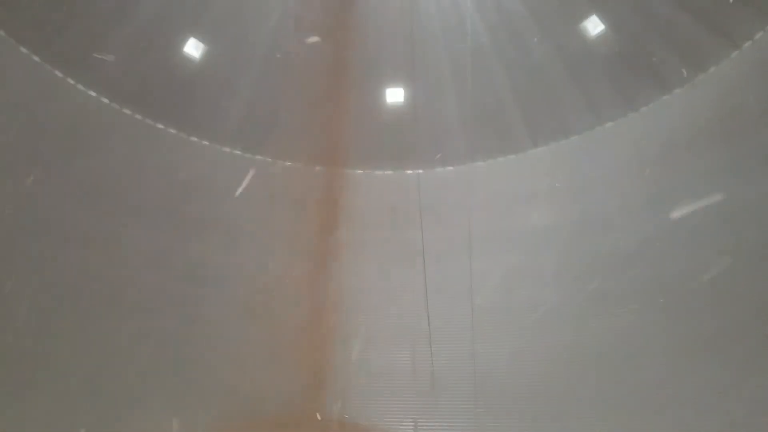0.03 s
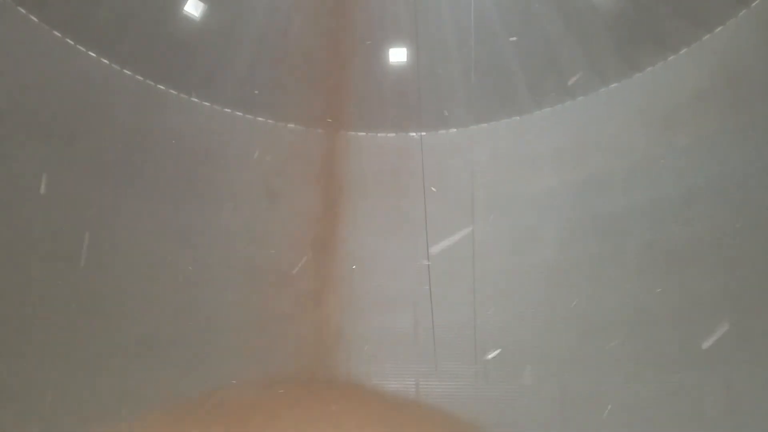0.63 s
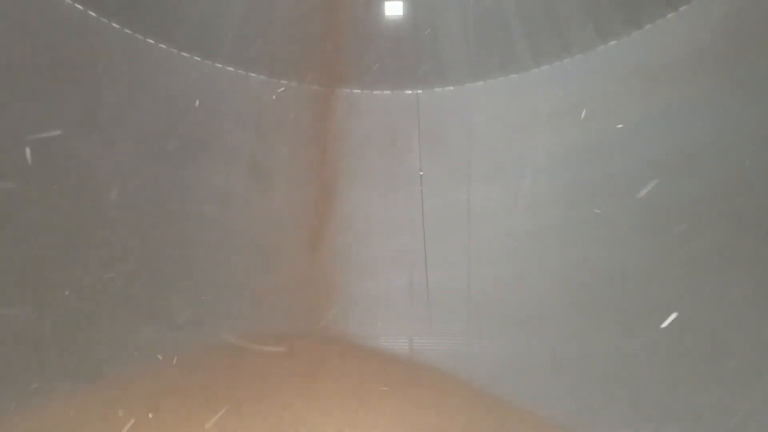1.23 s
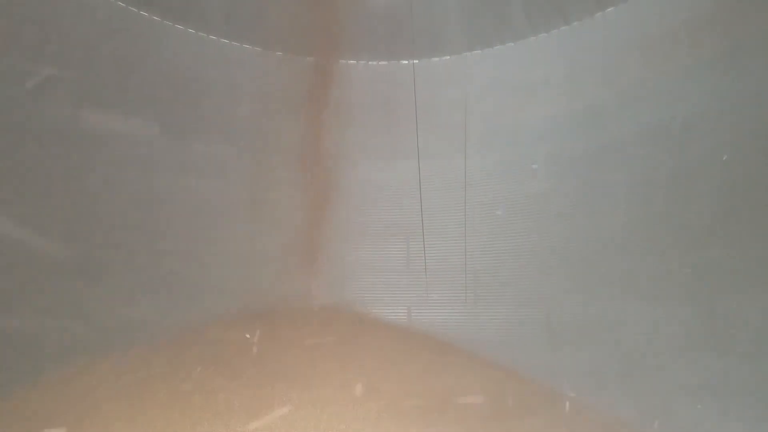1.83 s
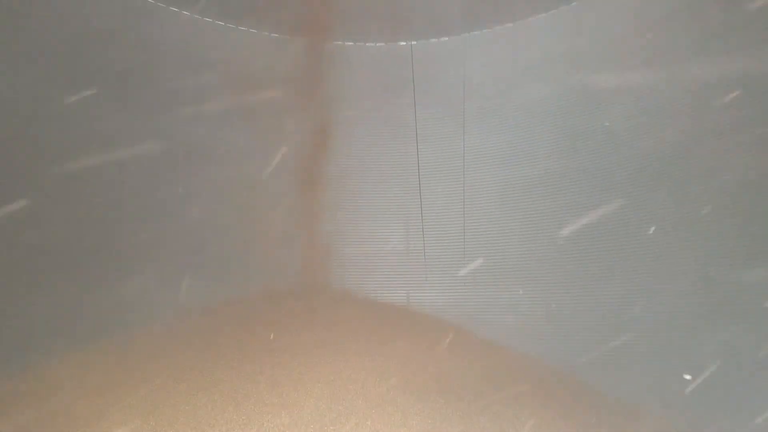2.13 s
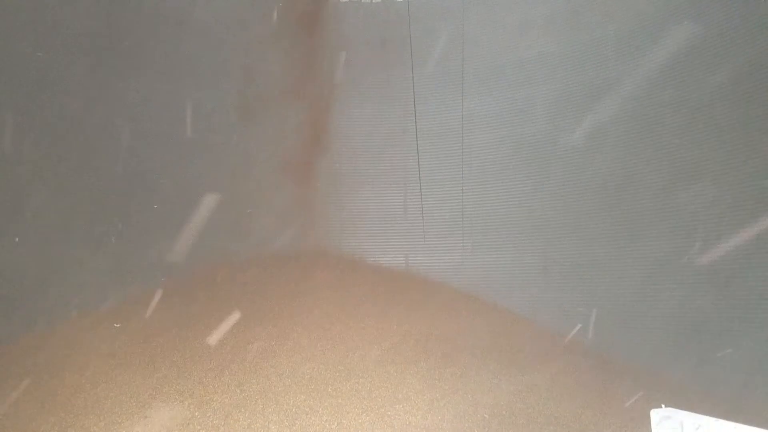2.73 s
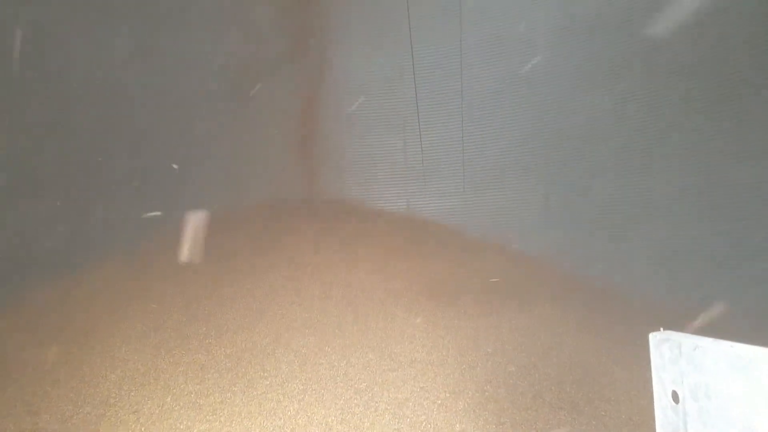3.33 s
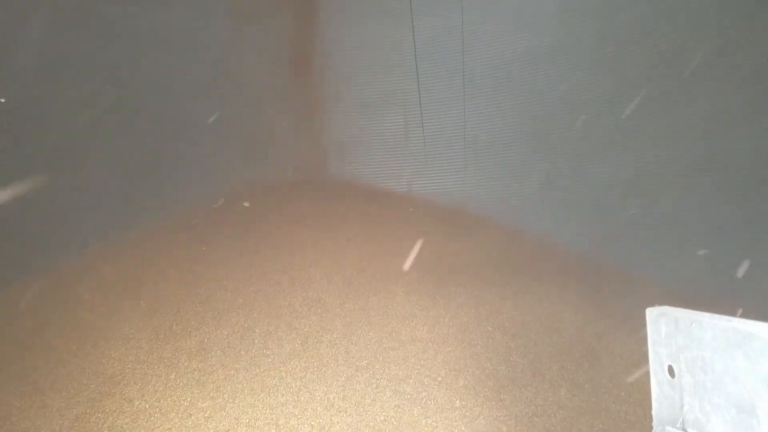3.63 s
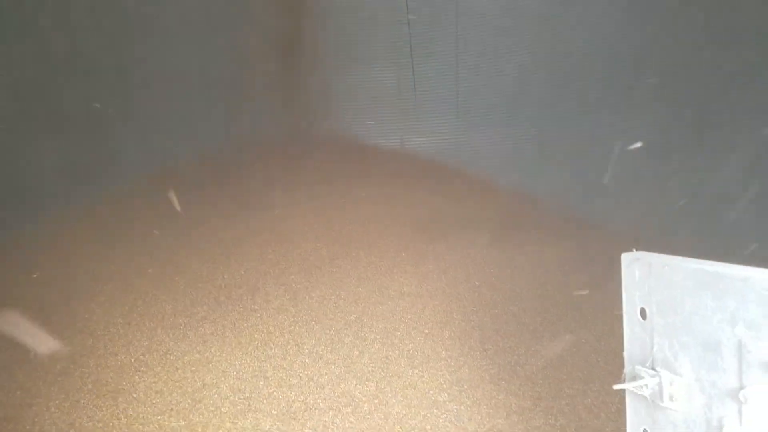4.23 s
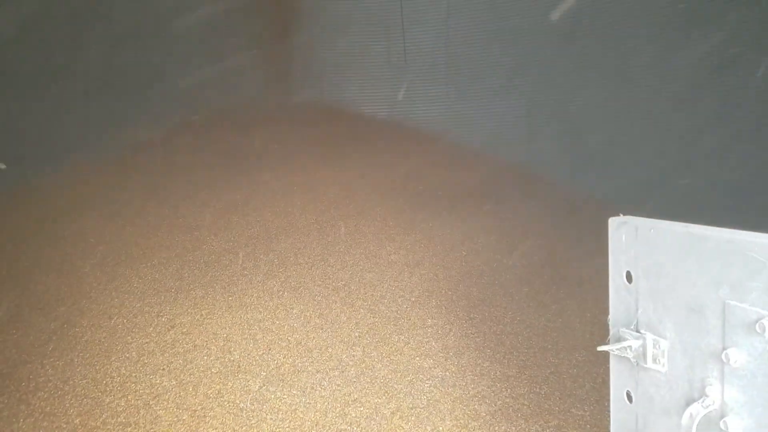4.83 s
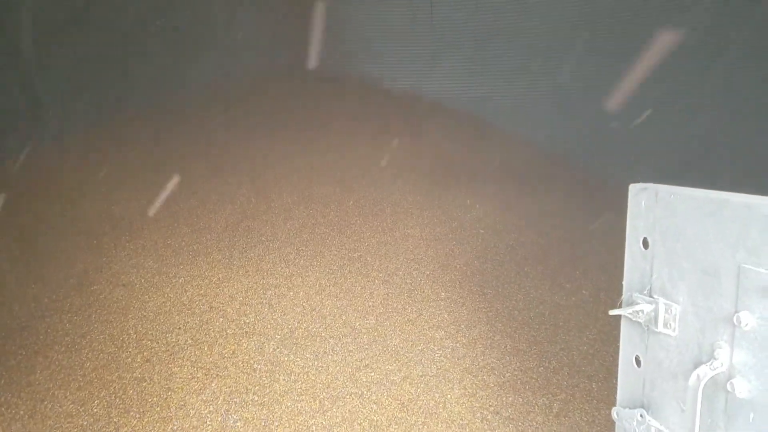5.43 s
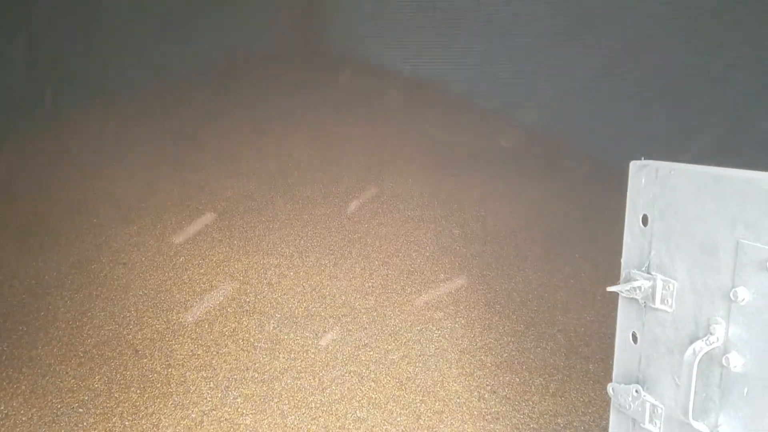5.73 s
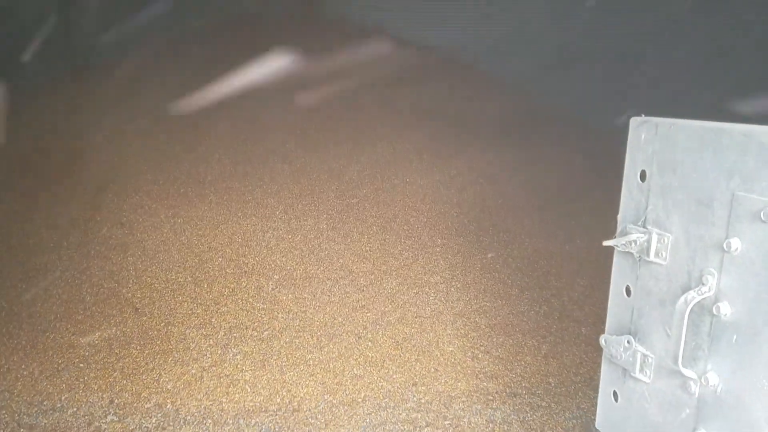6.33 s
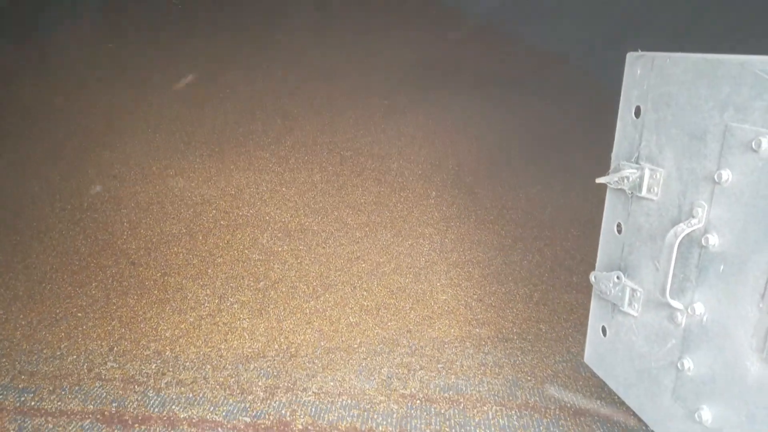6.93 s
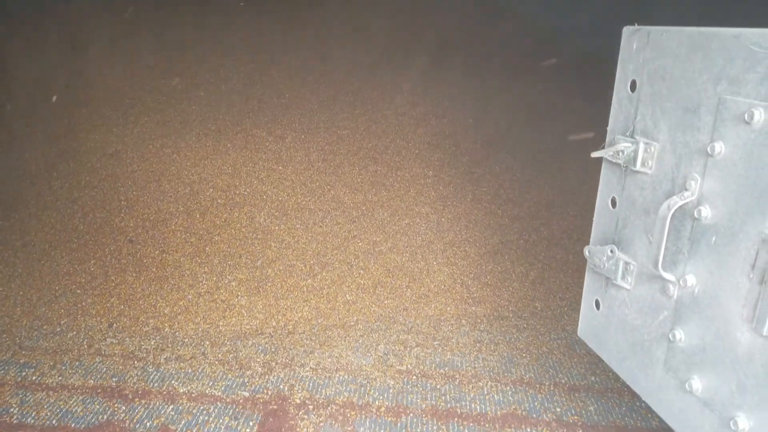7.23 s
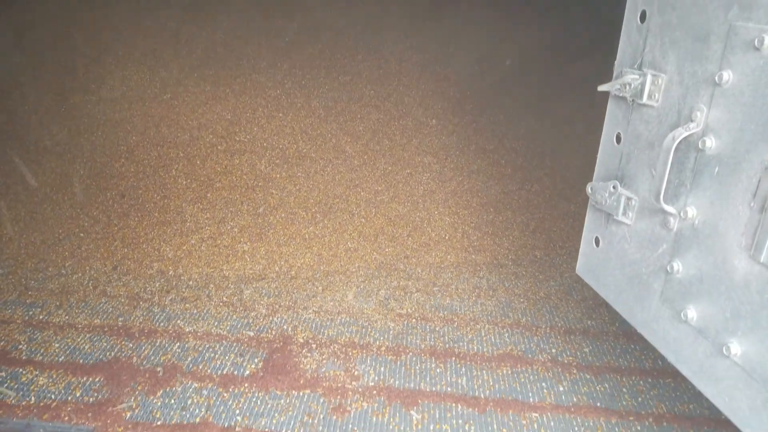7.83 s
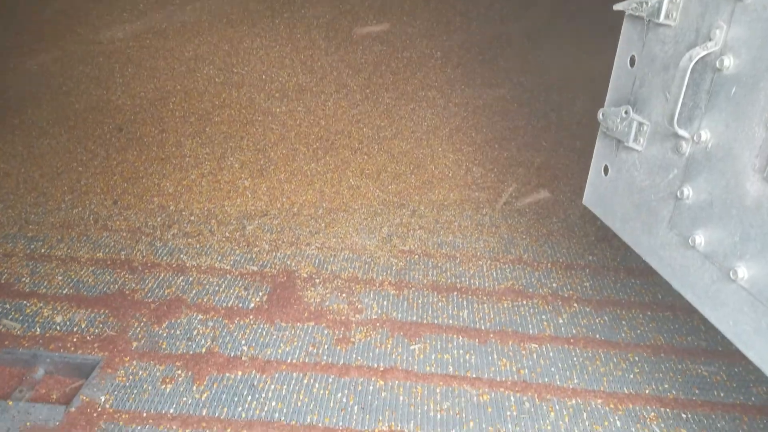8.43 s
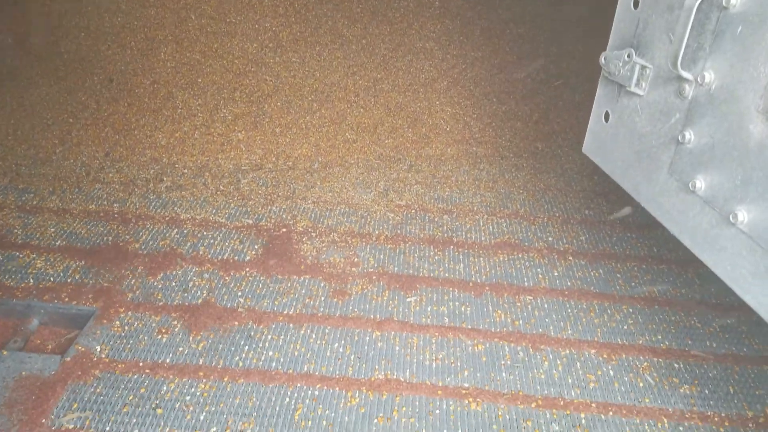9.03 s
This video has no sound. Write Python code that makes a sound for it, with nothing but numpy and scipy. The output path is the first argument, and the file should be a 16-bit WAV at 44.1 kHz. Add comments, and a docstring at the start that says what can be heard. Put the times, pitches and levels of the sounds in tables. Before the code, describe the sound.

Heard at the hatch of a large steel bin, falling corn makes an even rush with a high sizzle, beneath the loud, steady hum of a fan and booming air. The fan's buzzing overtones shift as the microphone backs out, and its main tone gradually fades on the right side. In the last three seconds, single kernels tick lightly on the metal floor and the rumble and rush swell slightly.

```python
"""Corn filling a steel bin

Corn streams onto its pile in a big steel bin, heard at the open hatch. Countless kernel hits merge
into a rush and a bright hiss. An aeration fan drones loudly over rumbling air; its blade tone forms
loud and quiet spots in the bin. The listener backs out of the hatch and turns to the floor,
where stray kernels tick."""
import sys
import numpy as np
from scipy import signal
from scipy.fft import rfft, irfft, next_fast_len
from scipy.io import wavfile

SR = 44100
rng = np.random.default_rng(int(sys.argv[2]) if len(sys.argv) > 2 else 0)


def pcm_store(signal):
    """Save signal as 16-bit PCM."""
    levels = np.round(np.clip(np.atleast_2d(signal), -1, 1) * 32767)
    wavfile.write(sys.argv[1], SR, levels.astype(np.int16).T)


N = 400869

# Where the listener is. Each row: time in seconds, place from 0 (inside) to 1 (outside).
LISTENER_PLACE = [(0, 0), (2.75, 0.0072), (3.05, 0.86), (9.09, 1)]
# How strongly the bin's sound reaches the listener. Each row: time in seconds, strength in dB.
# Only its rise and fall about the average is used, called the "swell" below.
BIN_STRENGTH = [(0.0, -27.5), (1.75, -26), (2.2, -25), (2.7, -24.5), (3.2, -27.5), (4.3, -26.5), (4.8, -27),
                (5.0, -27.0), (5.95, -26.5), (6.35, -26.5), (6.8, -24.5), (7.65, -23.5), (8.0, -21.5),
                (8.15, -23.5), (8.5, -22), (9.05, -21.0)]
# How alike the ears are in the echoing bin. Each row: frequency in Hz, likeness (1 same, -1 opposite).
EAR_LIKENESS = [(30, .55), (90, .42), (170, .85), (280, .65), (560, .5), (700, .2), (900, .12), (1250, -.3),
                (1750, -.1), (2200, .3), (4000, .08), (7000, 0)]

# Air churned by the fan. Each row: frequency in Hz, left and right base level in dB per Hz.
AIR_SPECTRUM = [(20, -67.3, -65), (40, -61, -54), (57.4, -52, -58), (70, -50.5, -53.5), (131, -53.5, -49),
                (170, -48, -46.5), (213, -53.5, -51.5), (265, -54.5, -53.5), (386, -56.5, -54.5),
                (458, -58.5, -62), (511, -54, -59), (717, -77, -55.5), (860, -81, -71)]
# Narrow resonances of bin and duct. Each row: pitch in Hz, width in Hz, base level in dB.
AIR_RESONANCES = [(162, 11, -37), (513, 12, -47.5), (871, 6.5, -55)]
# Brief surges of the rumble. Each row: time in seconds, half length in seconds, boost in dB.
RUMBLE_SURGES = [(0.555, 0.15, 5.5), (7.26, 0.11, 2.5), (9.06, 0.086, 4.5)]

# The blade tone at the left ear. Each row: time in seconds, level in dB.
BLADE_LEVEL = [(0.0, -11), (0.05, -8.5), (0.6, -9.2), (0.9, -7.5), (2.1, -8.5), (2.55, -7.5), (3.55, -8.5),
               (4.05, -7), (4.75, -7.4), (5.2, -6.5), (5.55, -7.6), (5.85, -7.0), (6.25, -8.5),
               (6.75, -6.5), (7.2, -7.3), (8.15, -8.5), (8.95, -7), (9.05, -8.2)]
# How far the right ear's wave runs ahead of the left.
# Each row: time in seconds, lead of the blade tone in radians, lead of its octave in radians.
RIGHT_EAR_LEAD = [(0, .38, .4), (2, .42, .1), (4, .62, 0), (6.2, .65, -.2), (6.7, .72, -2.6),
                  (8, .83, -3.3), (9.09, .85, -3.5)]
# Quiet spots: the right ear nears one of the blade tone, the left ear passes two of the octave.
# Each row: time in seconds, half width in seconds, share of the tone that remains at the centre.
BLADE_DIPS = [(9.84, 4.5, .03)]
OCTAVE_DIPS = [(1.2, 1.9, 0.49), (6.55, 2.1, .08)]
# The blades' buzz. Each row: multiple of the blade rate, right ear's base level in dB, extra dB inside,
# dB gained per dB of swell, left ear against right in dB, left ear's lag in radians.
BUZZ_HARMONICS = [(3, -37, -1, 0.5, -7, -2.5), (4, -38.5, 2.5, 1.23, -7, -2.5),
                  (5, -39.5, 5.5, 1.7, -12.5, 2.5), (6, -43, 0.5, 1.46, -12, 1.3)]
# The thin top of the buzz. Each row: multiple of the blade rate, dB against the sixth harmonic.
TOP_HARMONICS = [(7, -6.5), (8, -6), (9, -10), (10, -13), (11, -18), (12, -17)]
# Spots on the way where one harmonic stands out.
# Each row: time in seconds, half length in seconds, multiple of the blade rate, boost in dB.
BUZZ_LOUD_SPOTS = [(1.3, .25, 5, 1), (2.15, 0.52, 3, 8), (4.2, 0.23, 4, 1.5), (4.2, .3, 5, 6.5),
                   (5.6, 0.5, 3, 2), (6.8, .13, 4, 2), (8.652, 0.28, 3, 7)]
# Weak tones of the rotor. Each row: multiple of the shaft's turning rate, level in dB.
SHAFT_TONES = [(1, -49), (3, -43), (5, -42), (7, -49), (11, -57.5)]

# Falling corn heard inside the bin, and just outside the hatch.
# Each row: frequency in Hz, left and right base level in dB per Hz.
INSIDE_SPECTRUM = [(920, -63.5, -68.5), (1170, -68.5, -66), (1470, -69.5, -63.5), (2000, -68, -63.5),
                   (2430, -73, -66), (3300, -76.2, -66), (4100, -77.5, -67), (5060, -76.5, -71.5),
                   (6000, -77.5, -68), (7900, -69.5, -66), (9300, -77, -66), (11030, -64, -65.5),
                   (13460, -57, -55), (15600, -58, -54)]
OUTSIDE_SPECTRUM = [(885, -64.5, -62), (1200, -69, -63), (1420, -66.5, -63), (1900, -68, -61.5),
                    (2380, -75, -66), (3200, -74, -65), (4170, -74, -72), (5330, -74.5, -67.5),
                    (7560, -72, -70), (9050, -75, -68), (10640, -70, -68.0), (11630, -62, -63),
                    (13300, -61, -59.5), (15500, -61, -53)]
# The corn's rush, hiss and sizzle.
# Each row: gain in dB, extra dB inside, dB gained per dB of swell, wobble from clumps in dB.
CORN_BANDS = [(0.67, -0.3, 0.85, .5), (-1.16, -0.9, 0.9, 0.58), (-4.5, -5.3, 0.3, .38)]

BLADE_HZ, BLADES = 354.66, 6   # blade passes per second; blades on the rotor
KERNELS_PER_S, STRAY_KERNELS_PER_S = 40000, 120
CUTOFF_HZ = 15720
TIME_S = np.arange(N) / SR


def from_db(db):
    """Turn decibels into a gain."""
    return 10 ** (np.asarray(db) / 20)


def rms_one(x):
    """Scale a signal to an average strength (rms) of 1."""
    return x / np.sqrt(np.mean(np.abs(x) ** 2) + 1e-20)


def in_time(rows):
    """Join a table's points in time with straight lines, one curve per column."""
    seconds, *columns = np.transpose(rows)
    return np.array([np.interp(TIME_S, seconds, c) for c in columns])


def at_hz(rows, log_hz):
    """Read a table's columns along a logarithmic frequency axis."""
    hz, *columns = np.transpose(rows)
    return np.array([np.interp(log_hz, np.log(hz), c) for c in columns])


def bump(centre_s, half_s):
    """A smooth hill of height 1 around one moment."""
    return np.exp(-((TIME_S - centre_s) / half_s) ** 2)


def drift(rate):
    """A random wander of size 1 that changes about `rate` times a second."""
    step = 40   # samples between random points
    r = np.exp(-2 * np.pi * step * rate / SR)
    slow = signal.lfilter([1], [1, -2 * r, r * r], rng.standard_normal(N // step + 2002))[2000:]
    return np.interp(np.arange(N) / step, np.arange(len(slow)), rms_one(slow))


def cut(x, hz, kind, order=4):
    """Keep the "low" or the "high" side of a frequency."""
    return signal.sosfilt(signal.butter(order, hz, kind, fs=SR, output="sos"), x)


def split(x, hz):
    """Split a sound into a low and a high part that stay in step."""
    return cut(cut(x, hz, "low"), hz, "low"), cut(cut(x, hz, "high"), hz, "high")


def colour(noise, spectrum):
    """Blend two noises so the ears are partly alike, then give each ear its spectrum."""
    size = next_fast_len(N)
    log_hz = np.log(np.maximum(np.arange(size // 2 + 1) * SR / size, 1))
    alike = np.clip(at_hz(EAR_LIKENESS, log_hz), -1, 1)
    mid, side = rfft(noise, size)
    ears = np.sqrt((1 + alike) / 2) * mid + np.sqrt((1 - alike) / 2) * side * [[1], [-1]]
    return irfft(ears * from_db(at_hz(spectrum, log_hz)), size)[:, :N] * np.sqrt(SR / 2)


def inside_share():
    """How far the listener is inside the hatch, from 0 to 1."""
    return 1 - np.clip(in_time(LISTENER_PLACE)[0], 0, 1)


def heard_db(level_db, inside_db, follows):
    """A layer's level as the listener moves: it changes at the hatch and follows the swell."""
    strength_db = in_time(BIN_STRENGTH)[0]
    swell_db = strength_db - strength_db.mean()
    return level_db + inside_db * inside_share() + follows * swell_db


def air_resonance(hz, width_hz, level_db):
    """Blowing air makes the bin or duct ring at one hollow pitch."""
    r = np.exp(-np.pi * width_hz / SR)
    feedback = [1, -2 * r * np.cos(2 * np.pi * hz / SR), r * r]
    ringing = signal.lfilter([1, 0, -1], feedback, rng.standard_normal(N))
    return from_db(level_db) * rms_one(ringing)


def fan_air():
    """Churned air booms in the bin; its deep part grows most towards the floor and surges at times."""
    air, _ = split(colour(rng.standard_normal((2, N)), AIR_SPECTRUM), hz=990)
    ringing = sum(air_resonance(*row) for row in AIR_RESONANCES)
    deep, upper = split(air + ringing, hz=308)
    rumble_db = heard_db(level_db=-0.85, inside_db=-2.3, follows=0.94)
    surge_db = sum(boost_db * bump(s, half_s) for s, half_s, boost_db in RUMBLE_SURGES)
    return deep * from_db(rumble_db + surge_db) + upper * from_db(0.47 * rumble_db)


def flutter(depth, rate):
    """Swirling air shakes a tone in both strength and phase."""
    return 1 + depth * (drift(rate) + 1j * drift(rate))


def standing_wave(quiet_spots):
    """A tone's gain along the listener's path: it dips at each quiet spot in the bin."""
    dips = [np.sqrt(rest ** 2 + (1 - rest ** 2) * np.tanh((TIME_S - s) / half_s) ** 2)
            for s, half_s, rest in quiet_spots]
    return np.prod(dips, axis=0)


def overtone(multiple, phase, level_db, left_db, left_lag):
    """Short waves scatter round the wall: some flutter is shared, some is each ear's own."""
    left = from_db(left_db) * np.exp(-1j * left_lag) * flutter(depth=0.54, rate=5.7)
    right = flutter(depth=0.16, rate=4.0)
    shared = flutter(depth=0.047 * multiple, rate=14)   # higher harmonics shake more
    return np.array([left, right]) * from_db(level_db) * np.exp(1j * multiple * phase) * shared


def blade_buzz(phase):
    """The blades' higher harmonics buzz; some stand out as the listener passes their loud spots."""
    buzz = 0
    for multiple, level_db, inside_db, follows, left_db, left_lag in BUZZ_HARMONICS:
        buzz_db = heard_db(level_db, inside_db, follows)
        spots_db = sum(boost_db * bump(s, half_s)
                       for s, half_s, harmonic, boost_db in BUZZ_LOUD_SPOTS if harmonic == multiple)
        buzz += overtone(multiple, phase, buzz_db + spots_db, left_db, left_lag)
    sixth_db = buzz_db   # the thin top swells with the last harmonic above
    for multiple, relative_db in TOP_HARMONICS:
        buzz += overtone(multiple, phase, sixth_db + relative_db, left_db=-9.5, left_lag=0)
    return buzz


def shaft_hum(phase):
    """Unequal blades add faint tones at multiples of the shaft's turning rate."""
    return sum(from_db(level_db) * np.exp(1j * multiple * phase / BLADES) * flutter(depth=0.21, rate=2)
               for multiple, level_db in SHAFT_TONES)


def octave_tone(phase, right_lead):
    """The tone at twice the blade rate; it comes and goes at the left ear."""
    left = from_db(-31) * standing_wave(OCTAVE_DIPS)
    right = from_db(-25) * np.exp(1j * right_lead)
    swell = from_db(heard_db(level_db=0, inside_db=0, follows=0.64))
    return np.array([left, right]) * swell * np.exp(2j * phase) * flutter(depth=0.11, rate=6.6)


def blade_tone(phase, right_lead):
    """The loud tone at the blade rate; it fades as the right ear nears a quiet spot."""
    right = from_db(-0.7) * standing_wave(BLADE_DIPS) * np.exp(1j * right_lead)
    tone = from_db(in_time(BLADE_LEVEL)) * np.exp(1j * phase) * flutter(depth=0.031, rate=18)
    return np.array([np.ones(N), right]) * tone


def fan_drone():
    """Each passing blade gives the air a push; the pushes make a tone with many harmonics."""
    phase = 2 * np.pi * np.cumsum(BLADE_HZ + 0.12 * drift(rate=1)) / SR
    blade_lead, octave_lead = in_time(RIGHT_EAR_LEAD)
    tones = blade_buzz(phase) + shaft_hum(phase)
    tones += blade_tone(phase, blade_lead) + octave_tone(phase, octave_lead)
    return np.sqrt(2) * np.real(tones)   # the real part of these complex tones is the sound wave


def kernel_clicks(per_s, spread_db):
    """Kernels land at random moments, each with a force of its own."""
    lands = rng.random((2, N)) < per_s / SR
    force = rng.standard_normal((2, N)) * from_db(spread_db * rng.standard_normal((2, N)))
    return rms_one(lands * force)


def stray_kernels():
    """Single kernels tick on the steel floor, fading in as the listener turns to it."""
    clicks = kernel_clicks(STRAY_KERNELS_PER_S, spread_db=1.0)
    ticks = cut(cut(clicks, 2800, "high", order=2), 9000, "low", order=2)
    fade_in = np.clip((TIME_S - 6.1) / 2, 0, 1)   # starts at 6.1 seconds, takes 2 seconds
    return rms_one(ticks) * from_db(-39) * fade_in


def falling_corn():
    """Countless hits merge: the pile gives a dull rush, the hard hulls a hiss and a sizzle."""
    clicks = kernel_clicks(KERNELS_PER_S, spread_db=0.5)
    inside = inside_share()
    stream = inside * colour(clicks, INSIDE_SPECTRUM) + (1 - inside) * colour(clicks, OUTSIDE_SPECTRUM)
    rush, bright = split(cut(stream, 854, "high", order=5), hz=3620)
    hiss, sizzle = split(bright, hz=12700)
    corn = 0
    for band, (gain_db, inside_db, follows, clump_db) in zip((rush, hiss, sizzle), CORN_BANDS):
        wobble_db = clump_db * drift(rate=11)   # the corn falls in slightly uneven clumps
        corn += band * from_db(heard_db(gain_db, inside_db, follows) + wobble_db)
    return corn


def scene():
    """Fan and corn sound together in the bin."""
    return fan_drone() + fan_air() + falling_corn() + stray_kernels()


def record(dry):
    """Cut the very highest treble steeply and clip any peak just under full scale."""
    low_pass = signal.ellip(12, 0.1, 90, CUTOFF_HZ, fs=SR, output="sos")
    return np.clip(signal.sosfilt(low_pass, dry), -0.95, 0.95)


dry = scene()
out = record(dry)
pcm_store(out)
```